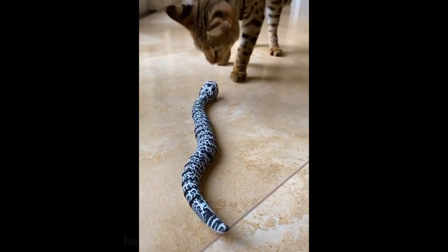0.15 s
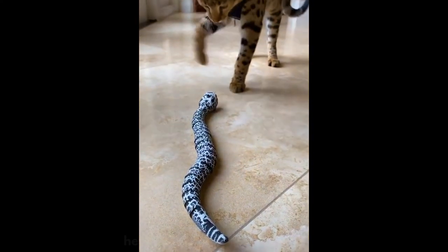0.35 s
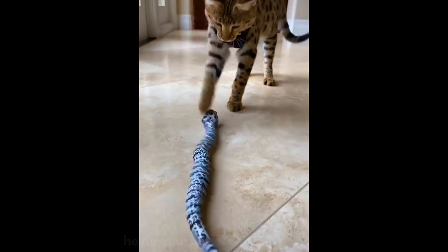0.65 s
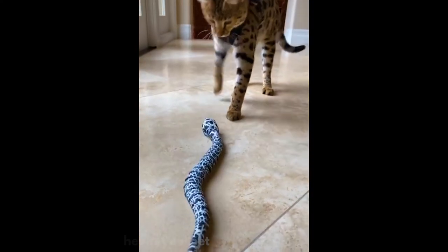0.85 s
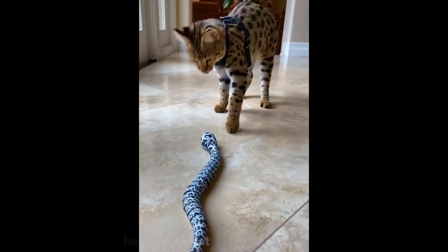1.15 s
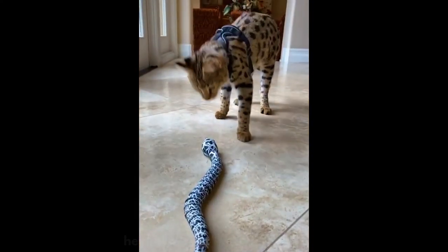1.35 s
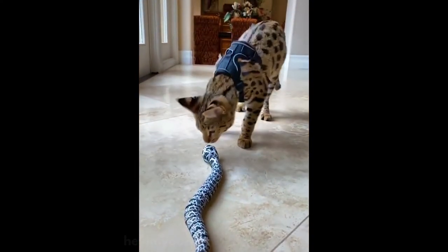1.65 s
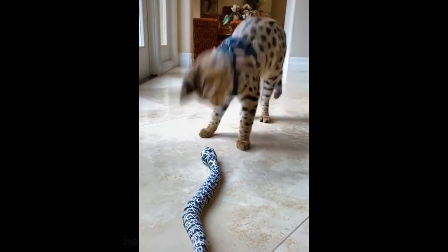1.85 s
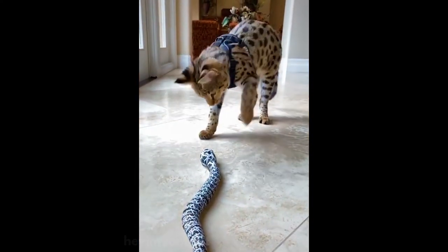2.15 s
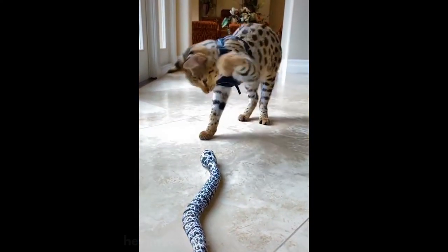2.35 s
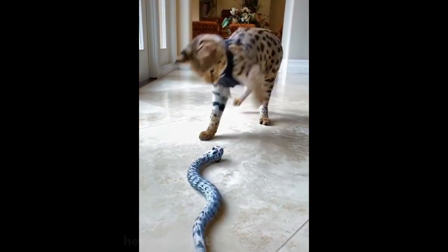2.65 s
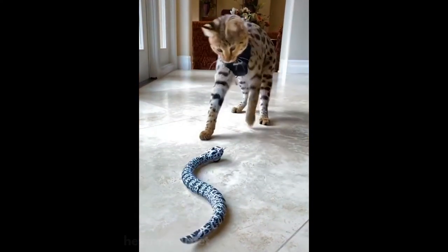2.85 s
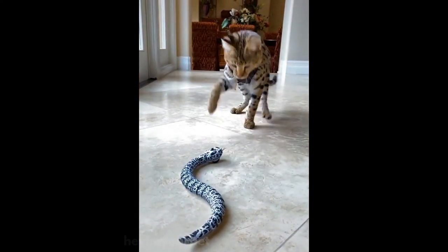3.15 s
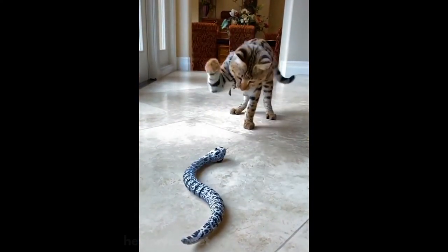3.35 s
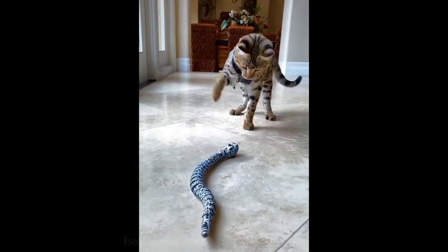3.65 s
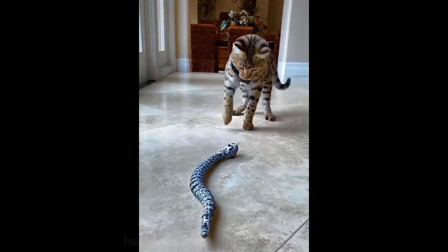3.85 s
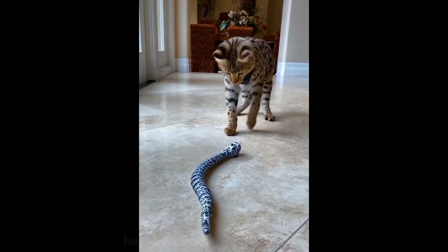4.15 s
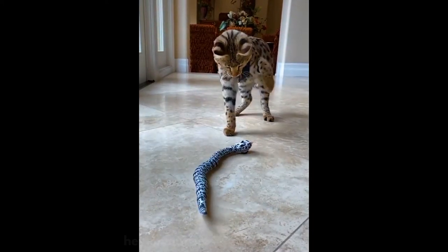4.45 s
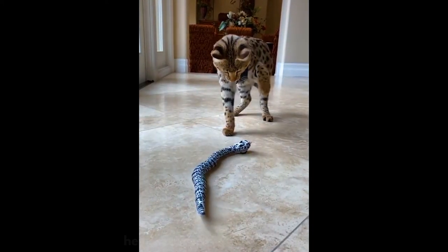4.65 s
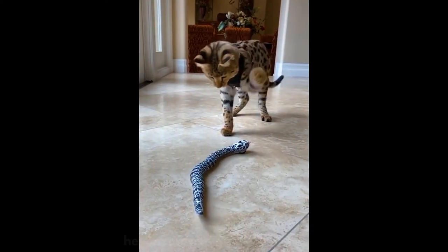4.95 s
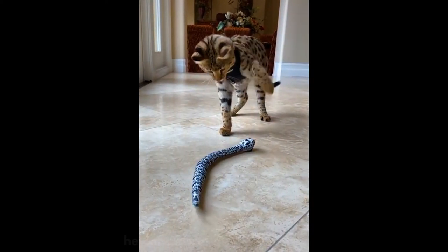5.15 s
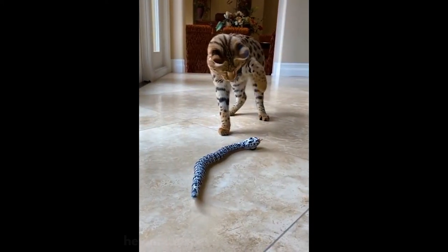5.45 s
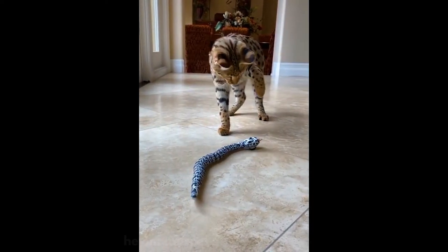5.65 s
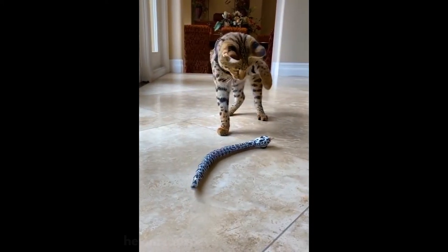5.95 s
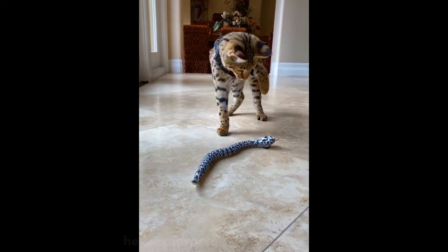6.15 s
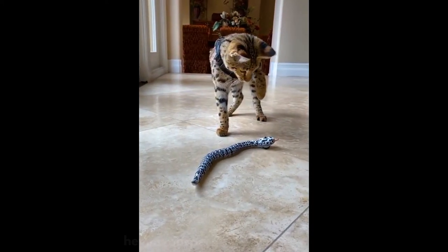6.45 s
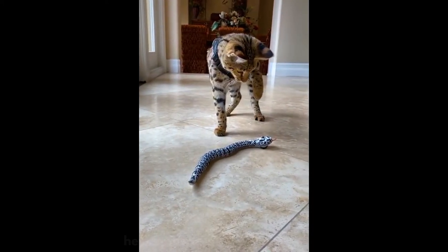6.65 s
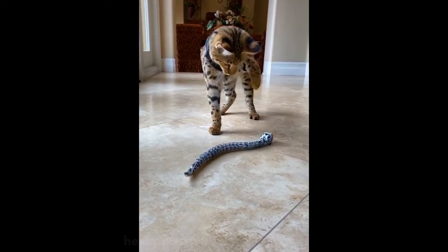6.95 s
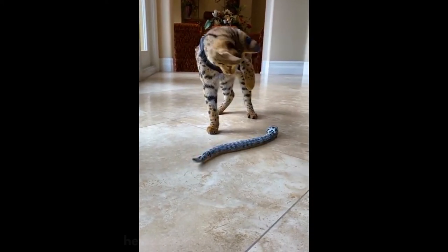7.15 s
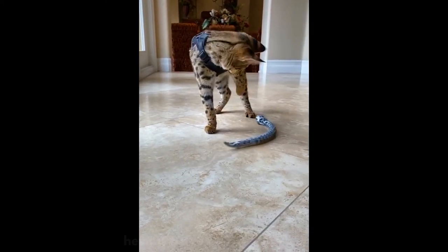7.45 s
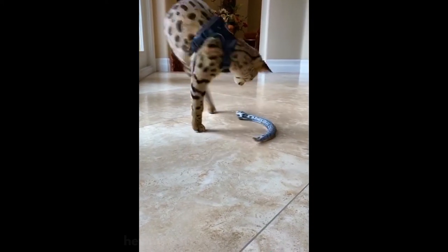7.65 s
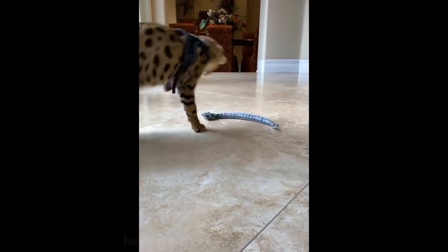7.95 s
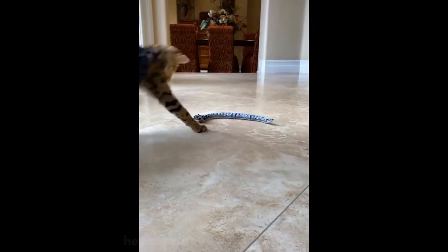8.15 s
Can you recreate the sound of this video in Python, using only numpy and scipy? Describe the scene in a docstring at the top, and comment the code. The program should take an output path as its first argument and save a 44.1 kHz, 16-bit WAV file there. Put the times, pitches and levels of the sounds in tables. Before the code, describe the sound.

Indoors on a stone floor, two abrupt breathy cat spits come first, separated by light plastic ticking, the second ending in a crisp slap. Then a small button snaps close to the microphone, and a motorised toy answers with a brief, bright, chattering rasp. This happens four times, before a final press sets off a long grinding hiss. Soft paw thuds land near the end, with short lively room reverberation.

```python
"""Low room air, a faint hum and soft rustles are heard first; then a cat twice stamps and spits a sharp hiss,
and its paw slaps a remote-controlled toy snake that it stalks on the stone floor of a live room.
Small plastic ticks sound nearby. A button clicks close by, five times, each press bringing a raspy hiss,
most likely gears and wheels; the last one is long. Shaped noise makes air, friction and slap,
decaying sines make struck parts, and decaying noise tails make the room."""
import sys
import numpy as np
from scipy import signal
from scipy.fft import rfft, irfft, next_fast_len
from scipy.io import wavfile
from scipy.ndimage import map_coordinates

SR = 44100
rng = np.random.default_rng(int(sys.argv[2]) if len(sys.argv) > 2 else 0)


def waveform_to_disk(signal):
    """Save audio, clipped to [-1, 1], as 16-bit WAV at the path in sys.argv[1]."""
    frames = np.transpose(np.atleast_2d(signal))
    scaled = np.clip(frames, -1, 1) * 32767
    samples = np.round(scaled).astype(np.int16)
    wavfile.write(sys.argv[1], SR, samples)


N = 365588  # length in samples
# All table levels are relative: each layer's gains are added to them.


def amp(db):
    """Logarithmic level: decibels become an amplitude ratio."""
    return 10 ** (np.asarray(db) / 20)


def unit(x):
    """Power normalisation: scale to rms 1."""
    return x / np.sqrt(np.mean(x ** 2) + 1e-20)


def along(points, hz):
    """Logarithmic frequency scale: interpolate (Hz, value) points on it."""
    f, v = np.transpose(points)
    return np.interp(np.log(hz + 1), np.log(f), v)


def seconds(length):
    """Sampling: the time axis of a given length in seconds."""
    return np.arange(round(length * SR)) / SR


def add(track, start_s, sound):
    """Superposition: mix a sound into a track, cut off at the track's end."""
    part = track[round(start_s * SR):][:len(sound)]
    part += sound[:len(part)]


def wobble(rate):
    """Band-limited random fluctuation: a smooth curve through rate random knots a second."""
    knots = rng.standard_normal(int(N * rate / SR) + 4)
    return map_coordinates(knots, [np.arange(N) * rate / SR])


def noise(colour, gain=1):
    """Spectral shaping: white noise under a gain curve, filtered by a spectrum of unit mean power."""
    size = next_fast_len(N + 4096)
    response = unit(amp(along(colour, np.fft.rfftfreq(size, 1 / SR))))
    white = gain * rng.standard_normal(N)
    return irfft(rfft(white, size) * response, size)[:N]


def envelope(start, length, attack, release):
    """Exponential relaxation: one attack, hold and release, all in seconds."""
    t = np.maximum(np.arange(N) / SR - start, 0)
    rise = 1 - np.exp(-t / attack)
    return rise * np.exp(-np.maximum(t - length, 0) / release)


def swell(peak_s, half_length):
    """Gaussian envelope: a bell-shaped rise and fall around its peak."""
    return np.exp(-((np.arange(N) / SR - peak_s) / half_length) ** 2)


def ring(modes):
    """Modal decay: damped sines (pitch_hz, level_db, t60_s), each level varied a little, with a peak of 1."""
    t = seconds(.1)
    x = np.zeros(len(t))
    for k, (hz, db, t60) in enumerate(modes):
        decay = amp(db + rng.normal(0, 1) - 60 * t / t60)
        x += (-1) ** k * decay * np.sin(2 * np.pi * hz * t)  # alternating polarity
    return x / np.abs(x).max()


# spectrum of the room air: pitch_hz, density_db (per Hz)
AIR_COLOUR = [(22, -31.5), (36, -13), (60, 0), (80, -3), (110, -6), (172, -12), (270, -16.5), (344, -13),
              (420, -18.5), (700, -20.5), (1400, -24), (3300, -28.5), (5700, -33), (13000, -41.5)]
# soft rustles of movement: peak_s, half_length_s, level_db
RUSTLES = [(.1, 0.46, -61.5), (1.793, 0.12, -51.5), (1.99, 0.042, -56.5), (6.143, 0.06, -51)]
# spectrum of the rustles: pitch_hz, density_db (per Hz)
RUSTLE_COLOUR = [(500, -0.5), (2500, -3), (5500, -1), (9000, 1), (11000, -10), (13000, -16)]


def background(air_db=-57.5, hum_db=-69, hum_hz=248, rustle_db=-5):
    """Broadband and tonal noise: low room air, a faint appliance hum and rustling movement."""
    drift = .3 * wobble(3.8)  # phase in radians
    hum = np.sqrt(2) * np.sin(2 * np.pi * hum_hz * np.arange(N) / SR + drift)
    movement = sum(amp(db) * swell(peak_s, half_length) for peak_s, half_length, db in RUSTLES)
    rustle = noise(RUSTLE_COLOUR, movement * amp(rustle_db + 0.62 * wobble(36)))
    return amp(air_db) * noise(AIR_COLOUR) + amp(hum_db) * hum + rustle


# the cat's pushes of air, two to a spit: start_s, length_s, level_db
PUSHES = [(0.486, 0.048, -31), (.546, 0.01, -24), (2.41, 0.0077, -18.5), (2.455, 0.1, -22.5)]
# hard, broad bursts in the spits; the last, brightest one is the paw slapping the toy:
# start_s, level_db, length_s, bright_db
BURSTS = [(0.501, -19, 0.0097, -30), (0.552, -19.5, .011, -23.5), (.615, -28, 0.0048, -48),
          (2.42, -19, 0.011, -41.5), (2.5366, -18, 0.011, -13)]
# spectrum of the spits and bursts: pitch_hz, density_db (per Hz)
SPIT_COLOUR = [(150, -27.5), (700, -18.5), (1300, -15.5), (1900, -7), (2500, 6.5), (3300, 0), (4200, 3),
               (5200, -2), (6500, -6.5), (8000, -7), (9600, -8), (10800, -22.5), (13000, -16)]
# bright spectrum of spits, bursts, plastic cracks and spring snaps: pitch_hz, density_db (per Hz)
BRIGHT_COLOUR = [(400, -28), (1500, -21), (2500, -6.5), (4000, -6.5), (6000, 6.5), (8000, 2), (10000, 2),
                 (11500, -14), (13000, -15.5)]
PUSH_ATTACK_S, PUSH_RELEASE_S = 0.0016, 0.018  # time constants of a push


def spits_and_slap(flow_db=-3, burst_db=-1, burst_treble_db=-2, flow_treble_db=-13, flutter_db=2.5):
    """Turbulent jet noise and impact: air forced through the cat's open mouth, with hard, broad bursts;
    the last, brightest burst is the paw slapping the toy."""
    t, bursts, burst_treble = seconds(.08), np.zeros(N), np.zeros(N)
    for start_s, db, length, bright_db in BURSTS:
        shape = (1 - np.exp(-t / 0.0007)) * np.exp(-(t / length) ** 4)
        add(bursts, start_s, amp(db + burst_db) * shape)
        add(burst_treble, start_s, amp(bright_db + burst_treble_db) * shape)
    flow = np.zeros(N)
    for start_s, length, db in PUSHES:
        flow += amp(db) * envelope(start_s, length, PUSH_ATTACK_S, PUSH_RELEASE_S)
    stream = amp(flow_db) * flow * unit(amp(flutter_db * wobble(350)))
    # stream and bursts add in power
    main = noise(SPIT_COLOUR, np.hypot(stream, bursts))
    treble = noise(BRIGHT_COLOUR, np.hypot(amp(flow_treble_db) * stream, burst_treble))
    return main + treble


# paws landing: start_s, level_db
PAWS = [(0.487, -33), (2.41, -28.5), (7.754, -27), (8.033, -31)]


def paws():
    """Damped impact: soft pads thud on the stone as short bursts of low noise."""
    t, thuds = seconds(0.13), np.zeros(N)
    for start_s, db in PAWS:
        add(thuds, start_s, amp(db - 9.5) * (1 - np.exp(-t / 0.0069)) * np.exp(-t / 0.019))
    return thuds * noise([(40, -27.5), (90, -1.5), (170, -5.0), (350, -14.5), (900, -27), (3000, -46.5)])


# small plastic ticks nearby: start_s, level_db, pitch_hz, knock_db
TICKS = [(0.578, -20, 2500, -21.5), (.736, -12, 4670, -16.5), (1.3849, -14, 9200, -48),
         (1.422, -66, 4000, -43), (1.6241, -37, 6200, -31), (1.642, -25, 5370, -30),
         (1.722, -39, 4770, -38.5), (1.813, -14.5, 5340, -29.5), (1.837, -27, 3100, -26.5),
         (1.844, -18, 5700, -33), (2.306, -27.5, 4380, -27.5), (5.371, -31.5, 6980, -60.5),
         (5.968, -50, 3980, -36), (6.055, -32, 2740, -34), (6.112, -18.5, 7030, -33.5)]
# dull spectrum of the knocks: pitch_hz, density_db (per Hz)
KNOCK_COLOUR = [(150, -32.5), (450, -20), (750, -3.5), (1300, -8.5), (2000, -7), (3500, -24.5)]


def ticks(crack_db=-5, knock_db=-5, tick_t60=0.0029, crack_life=0.0014, knock_life=0.0029):
    """Heavily damped impact: small plastic parts give a crack, a dead ring and a duller knock."""
    t, pings, bright, dull = seconds(.03), np.zeros(N), np.zeros(N), np.zeros(N)
    rise = 1 - np.exp(-t / 0.00036)
    for start_s, db, hz, low_db in TICKS:
        dead_ring = ring([(hz, 0, tick_t60), (1.15 * hz, -3, tick_t60)])
        add(pings, start_s, amp(db - 5.0) * dead_ring)
        add(bright, start_s, amp(db + crack_db) * rise * np.exp(-t / crack_life))
        add(dull, start_s, amp(low_db + knock_db) * rise * np.exp(-t / knock_life))
    return pings + noise(BRIGHT_COLOUR, bright) + noise(KNOCK_COLOUR, dull)


# the button, pressed and let go in turn: start_s, spring_db, case_db, case_pitch_hz (main mode)
CLICKS = [(3.115, -9.5, -18.5, 752), (3.2836, -33, -18.5, 690), (3.8264, -10, -20.5, 748),
          (4.1663, -17.5, -17, 730), (4.6608, -14.5, -23, 740), (5.1791, -22, -15.5, 730),
          (5.4184, -16, -22.5, 757), (5.746, -33, -16.5, 703), (6.5214, -7, -20, 1170),
          (7.8043, -33, -21, 1040)]
# modes of the button's spring: pitch_hz, level_db, share of SPRING_T60_S
SPRING = [(3130, -15, 0.99), (4445, 1.5, 1), (5000, -7.5, 0.75), (5630, -2.5, 0.77), (6390, 2.5, 0.66),
          (7100, -8.5, 0.75), (8500, 1, 0.3), (9200, -44.5, 0.41)]
# further modes of the button's case: pitch_hz, level_db, t60_s
CASE = [(585, -4, 0.0053), (970, -13.5, 0.036), (1456, -17.5, 0.019), (1778, 5.5, 0.0066), (2143, 4, 0.009)]
CASE_T60_S, SPRING_T60_S = .024, .015  # ring times of the main case mode and the spring


def button(snap_db=-8, snap_life=0.0016, knock_db=-13, knock_life=0.0046):
    """Modal excitation: the spring snaps brightly when pressed; on release mostly the hollow case knocks."""
    t, body, snaps, knocks = seconds(.03), np.zeros(N), np.zeros(N), np.zeros(N)
    spring = [(hz, db, share * SPRING_T60_S) for hz, db, share in SPRING]
    for start_s, spring_db, case_db, hz in CLICKS:
        case = [(hz, 0, CASE_T60_S)] + CASE
        add(body, start_s, amp(spring_db) * ring(spring) + amp(case_db) * ring(case))
        add(snaps, start_s, amp(spring_db + snap_db) * np.exp(-t / snap_life))
        add(knocks, start_s, amp(case_db + knock_db) * np.exp(-t / knock_life))
    # a small case radiates no bass
    body = signal.sosfilt(signal.butter(2, 480, "high", fs=SR, output="sos"), body)
    return body + noise(BRIGHT_COLOUR, snaps) + noise(KNOCK_COLOUR, knocks)


# the toy's runs: start_s, length_s, spin_up_s, gear_db, wheel_db, shell_ring_db, fizz_db
RUNS = [(3.148, 0.25, 0.042, -35.5, -34.5, 4, -19.5), (3.923, 0.25, .045, -33.5, -34.5, 1, -14),
        (4.809, 0.27, 0.044, -36.5, -35, 2.5, -19), (5.578, 0.27, .105, -33.5, -35, 2, -8),
        (6.601, 1.352, .23, -29, -33, 2.5, -1.5)]
# the gears strain as the body swings over: peak_s, half_length_s, rise_db
STRAINS = [(3.21, 0.02, 7.5), (3.282, 0.039, 10), (4.163, .028, 8.5), (4.873, 0.023, 8), (4.96, 0.018, 3.5),
           (5.083, 0.014, 10), (5.718, 0.023, 9), (5.817, 0.01, 9), (7.711, 0.13, 2.5)]
WHEEL_FOLLOWS = 0.91  # share of a strain's dB rise that the wheels follow
GEAR_START_DB, WHEEL_START_DB, RING_START_DB = -11, -3, -6  # at standstill, relative to full speed
SHELL_START_PITCH = .93  # ratio at standstill
SPIN_UP_STEEPNESS = 2.99  # exponent: the motor picks up slowly, then quickly
SWITCH_S, GEAR_COAST_S, WHEEL_STOP_S, RING_FADE_S = 0.0056, 0.051, 0.0047, .03  # time constants
BEND_SWING, BEND_RATE = .022, 7  # the bending body's random pitch swing: ratio, knots a second


def motor():
    """Rotational inertia: runs spin up, hold and coast, giving gear, wheel, fizz and ring gains and pitch ratio."""
    t = np.arange(N) / SR
    gears, wheels, fizz, ringing, shift = np.zeros((5, N))
    for start_s, length, spin_up, gear_db, wheel_db, ring_db, fizz_db in RUNS:
        running = t >= start_s  # lasts until the next run takes over
        lag = np.exp(-(np.maximum(t - start_s, 0) / spin_up) ** SPIN_UP_STEEPNESS)  # 1 still, 0 full speed
        gear_envelope = envelope(start_s, length, SWITCH_S, GEAR_COAST_S)
        wheel_envelope = envelope(start_s, length, SWITCH_S, WHEEL_STOP_S)
        ring_envelope = envelope(start_s, length, SWITCH_S, RING_FADE_S)
        gears += amp(gear_db + GEAR_START_DB * lag) * gear_envelope
        wheels += amp(wheel_db + WHEEL_START_DB * lag) * wheel_envelope
        fizz = np.where(running, amp(fizz_db), fizz)
        ringing = np.where(running, amp(ring_db + RING_START_DB * lag) * ring_envelope, ringing)
        shift = np.where(running, SHELL_START_PITCH ** lag, shift)
    strain_db = sum(db * swell(peak_s, half_length) for peak_s, half_length, db in STRAINS)
    gears = gears * amp(strain_db)
    wheels = wheels * amp(WHEEL_FOLLOWS * strain_db)
    return gears, wheels, fizz, ringing, shift * (1 + BEND_SWING * wobble(BEND_RATE))


SHELL_DRIFT = .015  # quick waver of the shell's pitch (ratio)


def narrow(hz, width):
    """Narrow-band resonance: randomly modulated quadrature carriers, their pitch wavering a little."""
    phase = 2 * np.pi * np.cumsum(hz * (1 + SHELL_DRIFT * wobble(14))) / SR
    return wobble(width) * np.cos(phase) + wobble(width) * np.sin(phase)


# the loudest catches of the gears and joints: start_s, level_db
CATCHES = [(3.215, -10.5), (3.358, -10.5), (3.368, -20), (3.412, -11.5), (3.421, -11.5), (3.984, -18),
           (4.032, -11.5), (4.062, -13.5), (4.117, -14), (4.867, -12.5), (4.873, -14.5), (4.883, -12.5),
           (4.934, -15), (5.2, -16), (5.698, -15), (5.729, -21), (5.786, -18), (6.863, -27), (6.955, -13),
           (7.191, -14), (7.25, -12)]
# resonances of the toy's shell: pitch_hz, width_hz, level_db
SHELL = [(2476, 450, -11), (4022, 420, -6), (4870, 790, -11.5)]
# single narrow bands of the shell that swell up: peak_s, half_length_s, pitch_hz, width_hz, level_db
SINGS = [(1.187, .04, 2425, 348, -66.5), (7.493, 0.14, 4590, 393, -40), (7.881, 0.042, 2695, 447, -30.5)]
# spectrum of the gears' rasp: pitch_hz, density_db (per Hz)
GEAR_COLOUR = [(300, -36), (1000, -28), (1450, -23), (1900, -12), (2350, -3), (3100, 0), (4050, -1.5),
               (5000, -1.5), (6000, -4.5), (7500, -7.5), (9000, -26), (13000, -43)]
# spectrum of the wheels' hiss: pitch_hz, density_db (per Hz)
WHEEL_COLOUR = [(1000, -30), (2400, 1), (5000, -32), (7600, -4), (8550, 5.5), (9300, 1), (10200, -4.5),
                (11200, -12.5), (13000, -16)]
# spectrum of the wheels' finest fizz: pitch_hz, density_db (per Hz)
FIZZ_COLOUR = [(3000, -20.5), (8000, -2), (10000, 6), (10900, -2), (11400, -5.5), (13000, -13.5)]
CATCH_LIFE_S, TOOTH_LIFE_S = .0027, .0016  # decay times of a joint's catch and of one gear tooth
JOLT_DB = -19.5  # level of the jolt that starts every run, on the scale of CATCHES


def toy(rasp_db=-5.5, hiss_db=-5.0, catch_db=-11, chatter=1.0, swell_db=3):
    """Friction and random impacts: gear teeth chatter over a smooth hiss, joints catch, the shell resonates."""
    t = seconds(.03)
    gears, wheels, fizz, ringing, shift = motor()
    # on average 170 tooth impacts a second, of uneven strength
    teeth = (rng.random(N) < 170 / SR) * amp(6.0 * np.clip(rng.standard_normal(N), -2, 2))
    grain = unit(1 + chatter * signal.fftconvolve(teeth, np.exp(-t / TOOTH_LIFE_S))[:N])
    snag = (1 - np.exp(-t / .0005)) * np.exp(-t / CATCH_LIFE_S)
    jolts = [(run[0], JOLT_DB) for run in RUNS]
    catches = np.zeros(N)
    for start_s, db in CATCHES + jolts:
        add(catches, start_s, amp(db + catch_db) * snag)
    drive = amp(rasp_db) * gears * grain + catches
    rasp = noise(GEAR_COLOUR, drive)
    for hz, width, db in SHELL:  # the resonances rise and swell as the motor gains speed
        resonance = narrow(hz * shift, width)
        rasp += drive * ringing * amp(db + swell_db * wobble(22)) * resonance
    for peak_s, half_length, hz, width, db in SINGS:
        rasp += amp(db) * swell(peak_s, half_length) * grain * narrow(hz, width)
    rolling = amp(hiss_db) * wheels * np.sqrt(grain) + 0.77 * catches
    return rasp + noise(WHEEL_COLOUR, rolling) + noise(FIZZ_COLOUR, fizz * rolling)


# reverberation of the room: pitch_hz, t60_s
ROOM = [(200, 0.95), (1000, 0.85), (2500, 0.54), (5000, 0.56), (9000, 0.4), (13000, 0.32)]


def room(x, count=20):
    """Reverberant decay: the treble dies first, and the echo keeps changing as it passes from tail to tail."""
    hz, t, z = signal.stft(rng.standard_normal((count, SR)), SR, nperseg=256)
    decay = amp(-60 * t / along(ROOM, hz)[:, None])
    tails = signal.istft(z * decay, SR, nperseg=256)[1]
    tails = np.pad(tails / np.linalg.norm(tails[0]), ((0, 0), (round(.008 * SR), 0)))  # 8 ms delay
    turn = (np.arange(N) / (SR // 100) - np.arange(count)[:, None]) % count  # a new tail every 10 ms
    shares = np.sin(np.pi / 2 * np.minimum(turn, 2))  # equal-power hand-over from tail to tail
    return signal.fftconvolve(x * shares, tails, axes=1).sum(axis=0)[:N]


def scene(cat_wet_db=-7.5, toy_wet_db=-4, near_wet_db=-28):
    """Direct-to-reverberant ratio: cat and toy are out in the room; the clicks are close and almost dry."""
    cat, snake, near = spits_and_slap(), toy(), button() + ticks()
    echo = room(amp(cat_wet_db) * cat + amp(toy_wet_db) * snake + amp(near_wet_db) * near)
    return cat + snake + near + paws() + echo + background()


TOP_HZ = 13150  # the recorder's band limit


def record(dry):
    """Band limitation: a very steep low-pass leaves almost nothing above the recorder's limit."""
    size = next_fast_len(N + 4096)
    hz = np.fft.rfftfreq(size, 1 / SR)
    response = 1 / np.sqrt(1 + (hz / TOP_HZ) ** 140)
    return irfft(rfft(np.atleast_2d(dry), size) * response, size)[:, :N]


dry = scene()
out = record(dry)
waveform_to_disk(out)
```